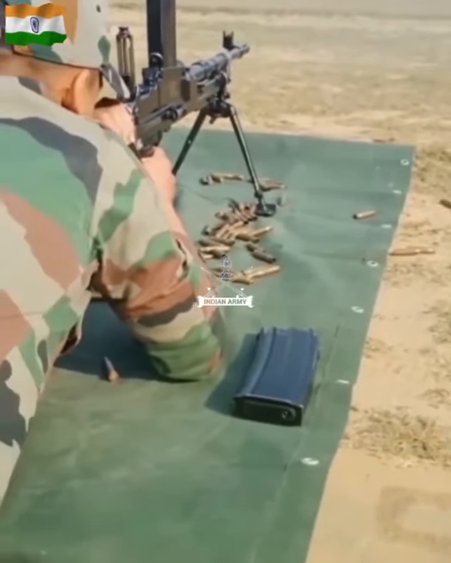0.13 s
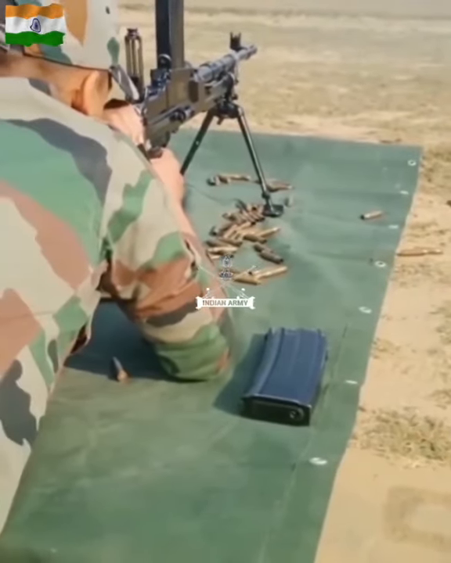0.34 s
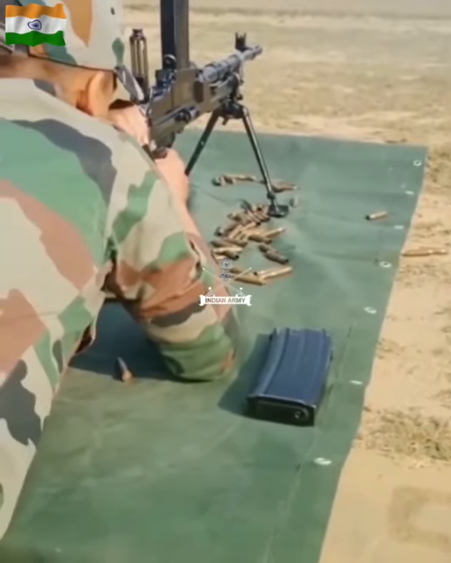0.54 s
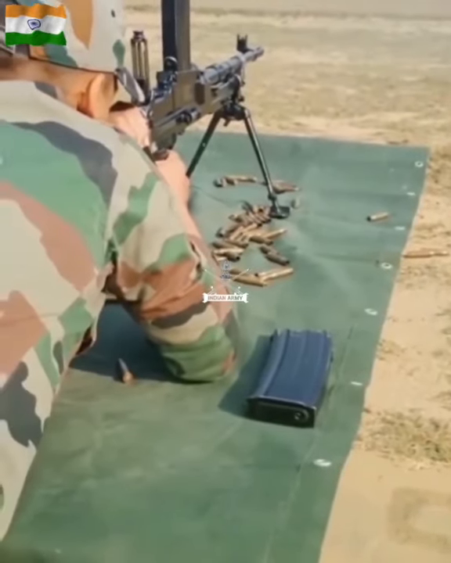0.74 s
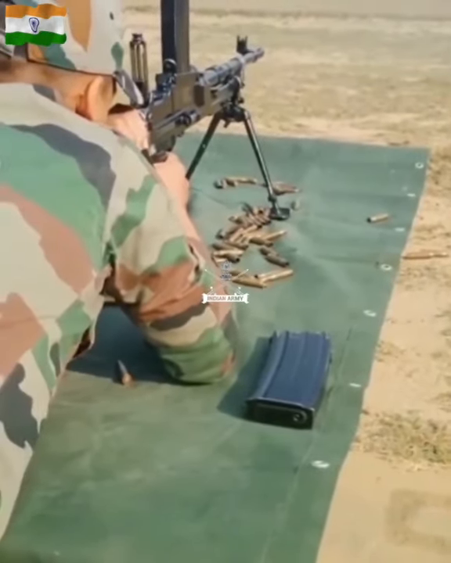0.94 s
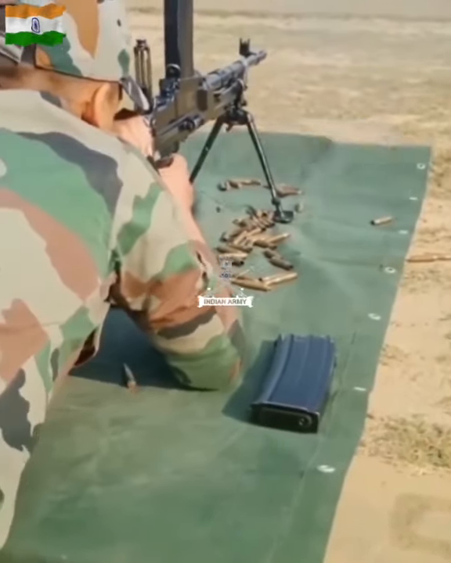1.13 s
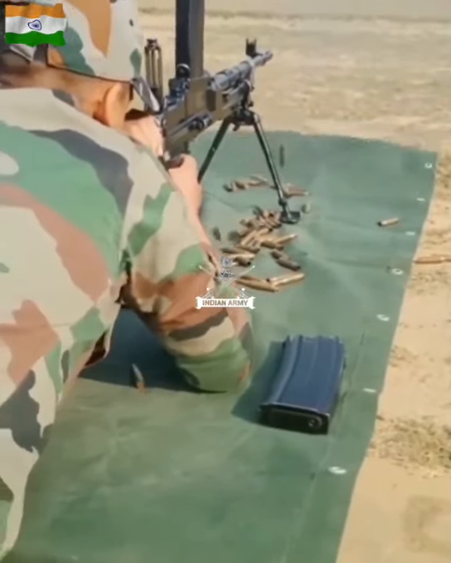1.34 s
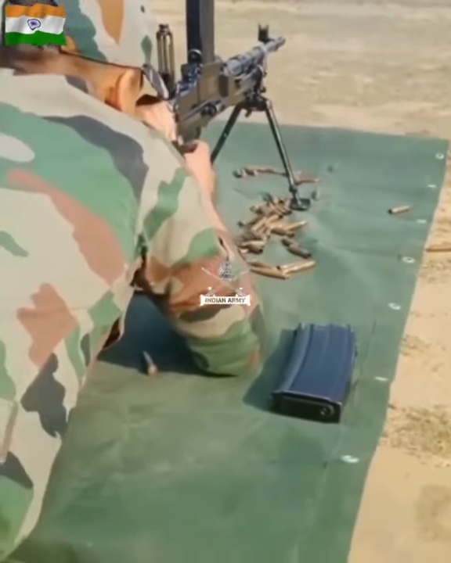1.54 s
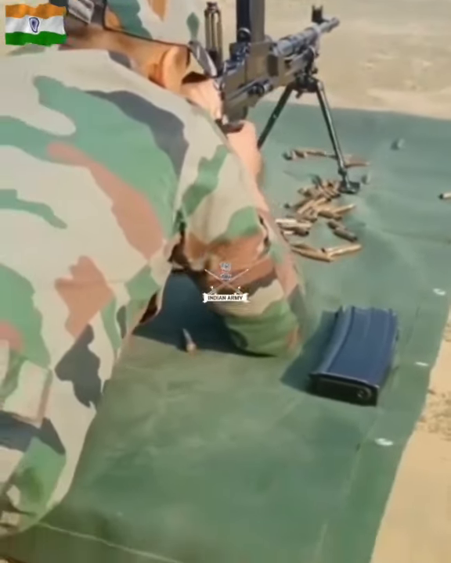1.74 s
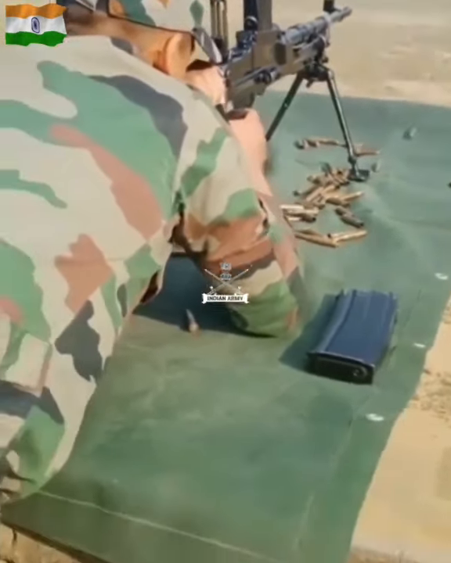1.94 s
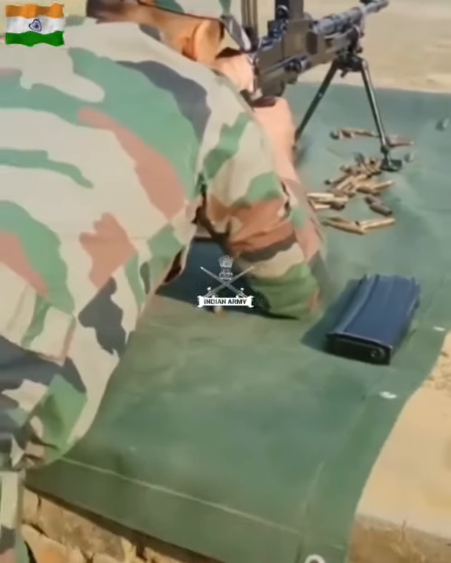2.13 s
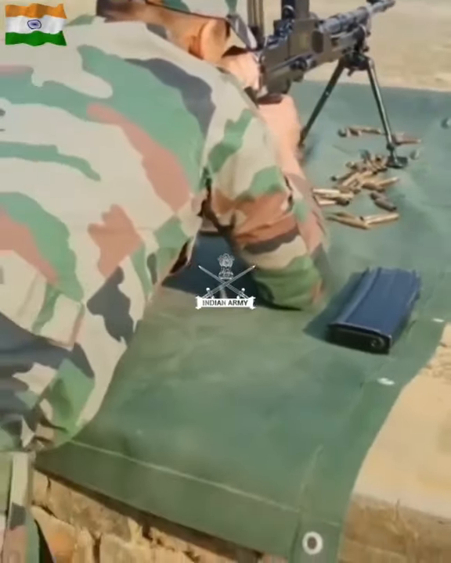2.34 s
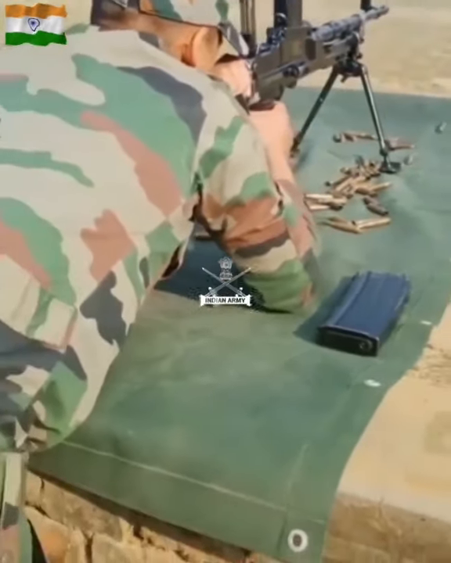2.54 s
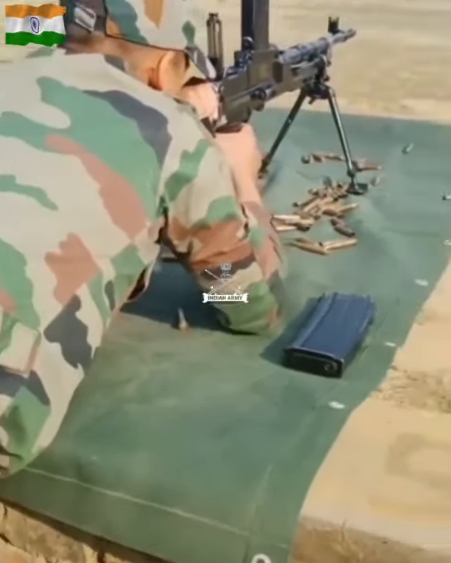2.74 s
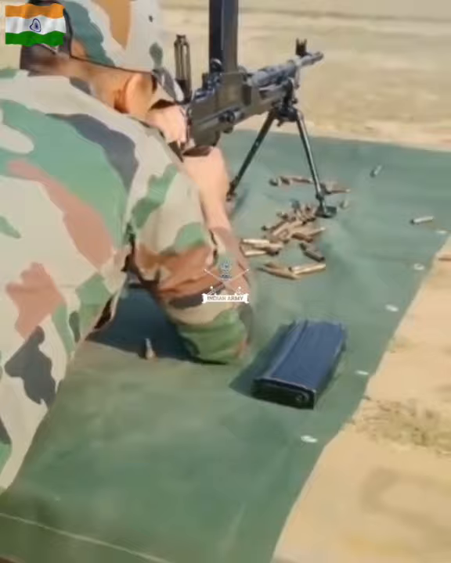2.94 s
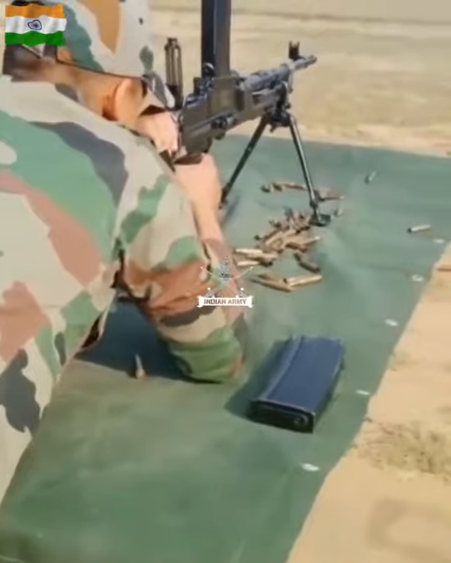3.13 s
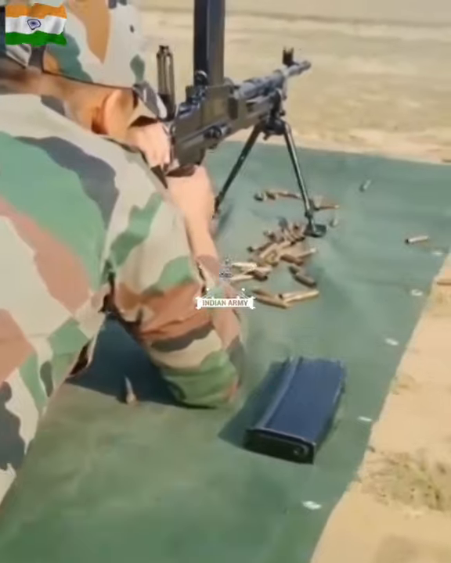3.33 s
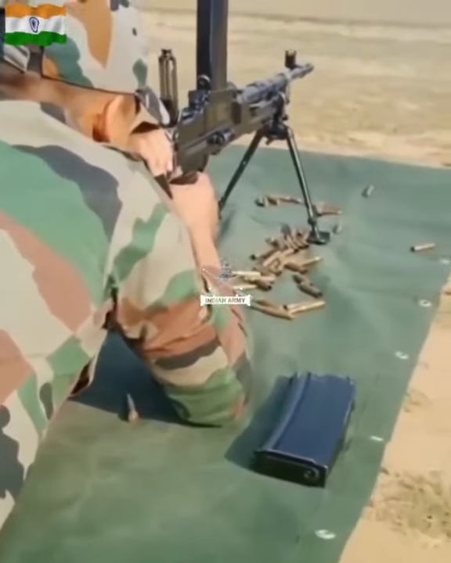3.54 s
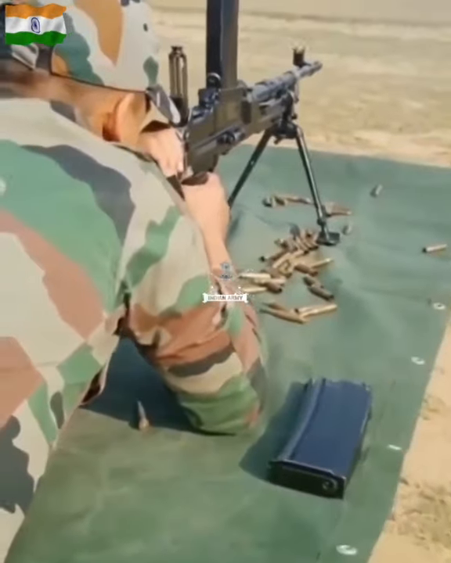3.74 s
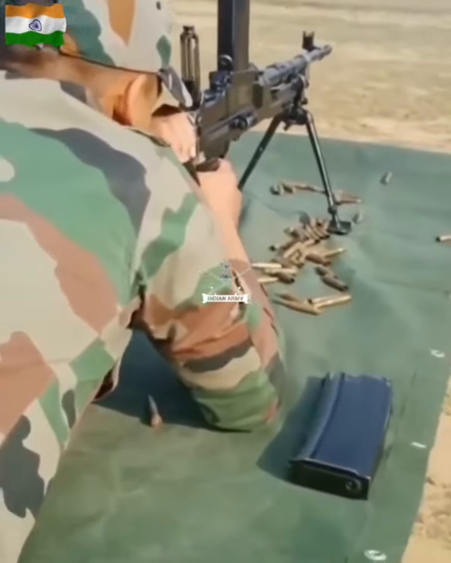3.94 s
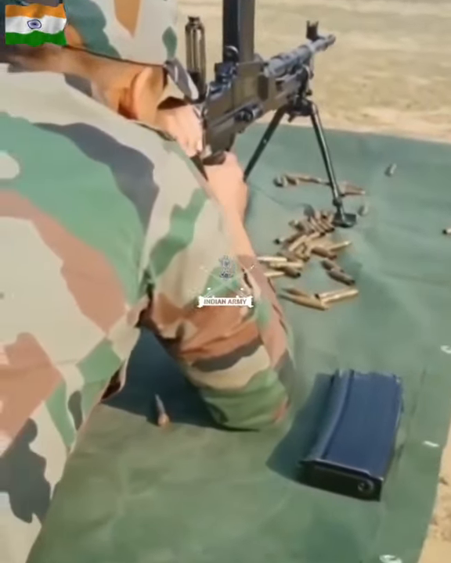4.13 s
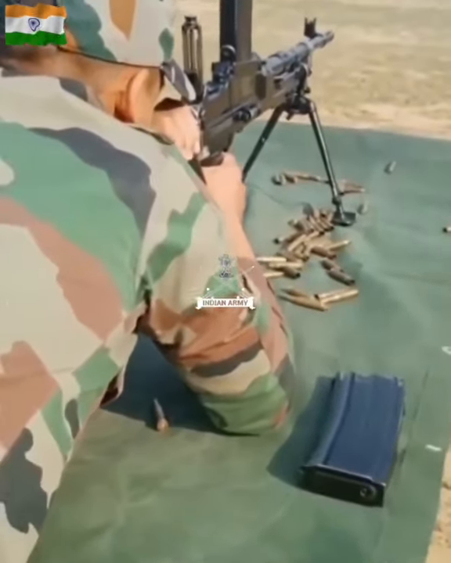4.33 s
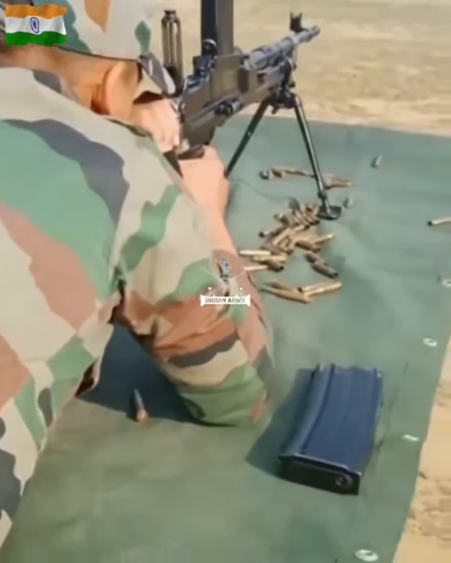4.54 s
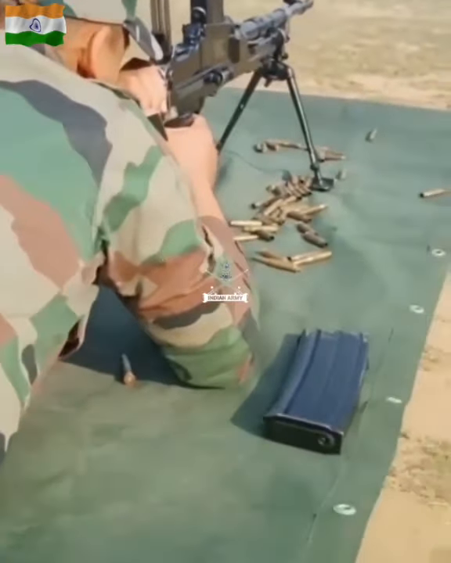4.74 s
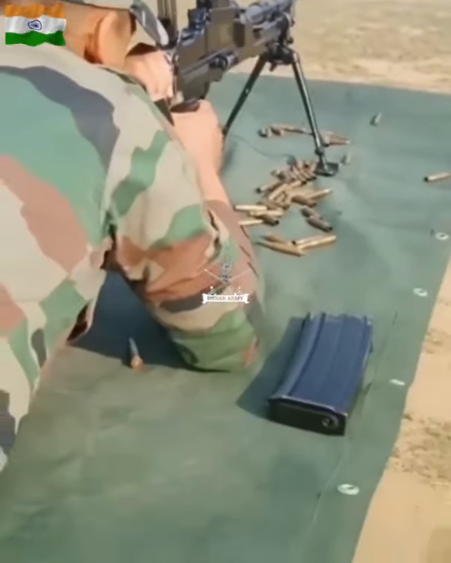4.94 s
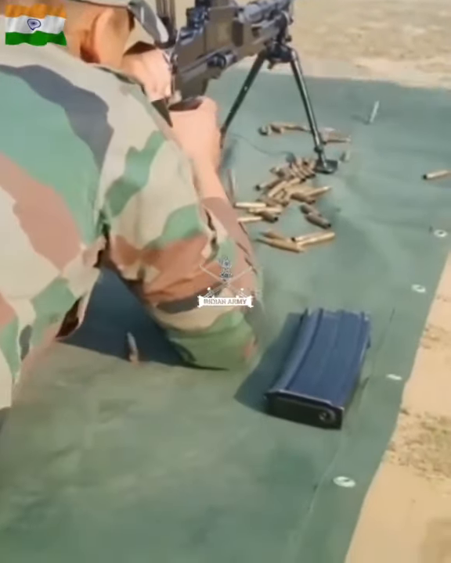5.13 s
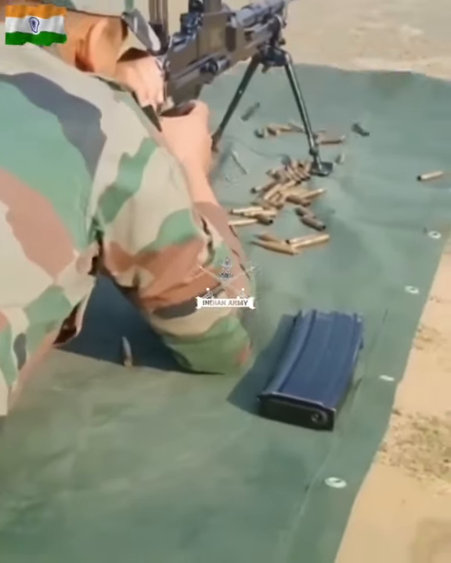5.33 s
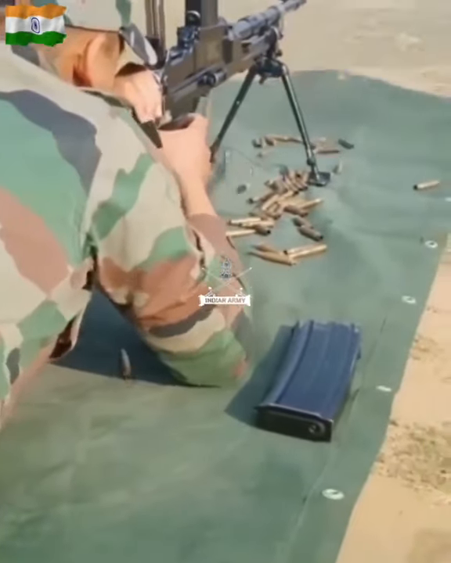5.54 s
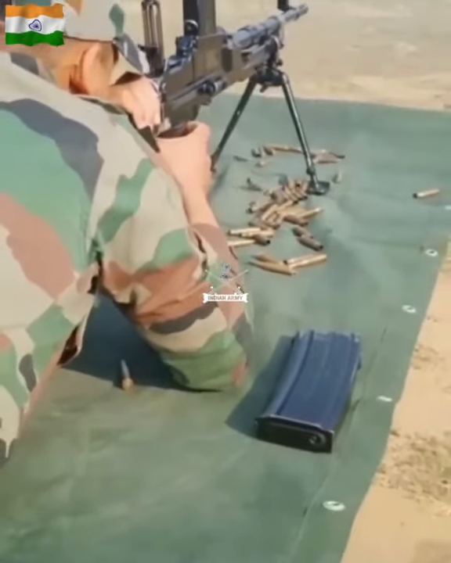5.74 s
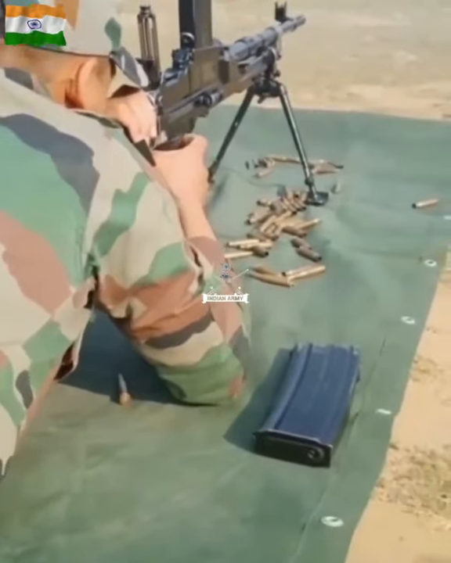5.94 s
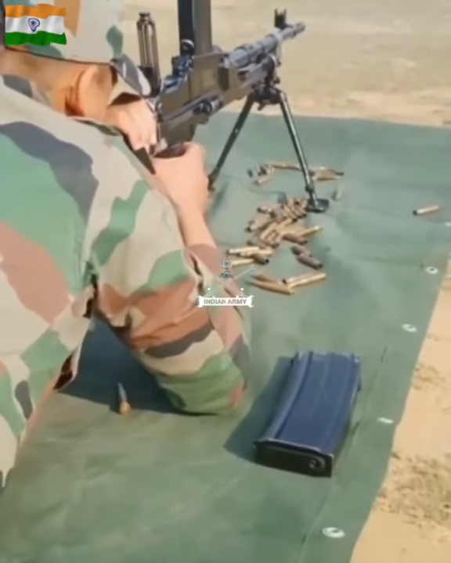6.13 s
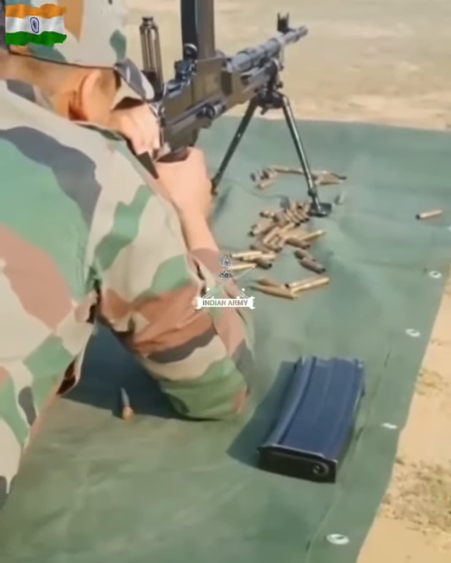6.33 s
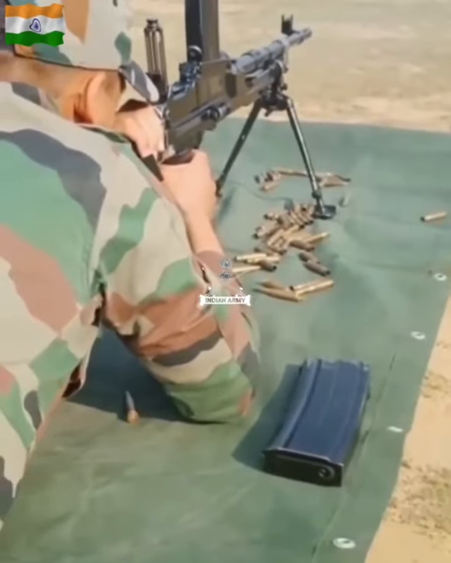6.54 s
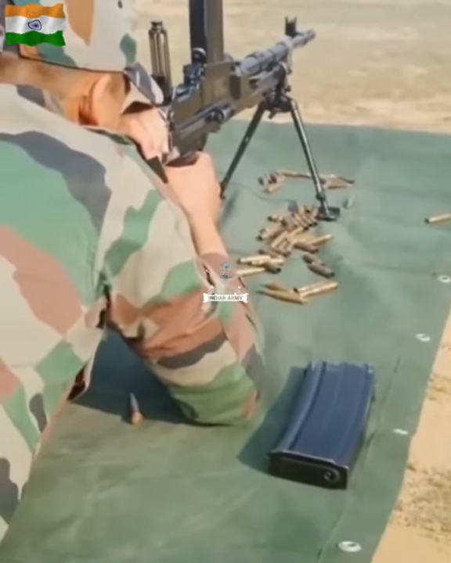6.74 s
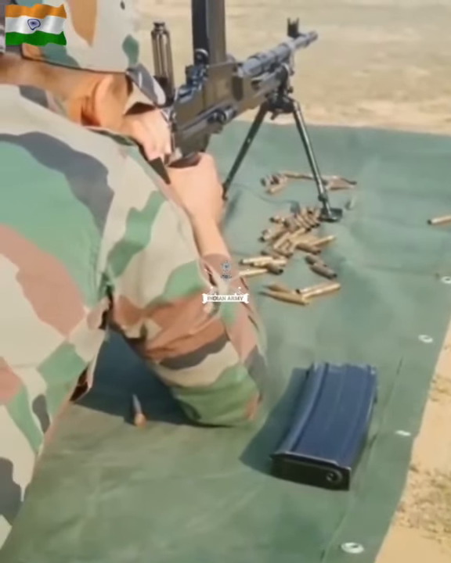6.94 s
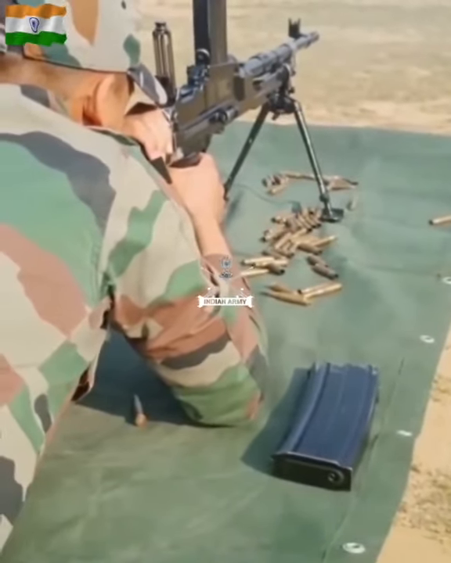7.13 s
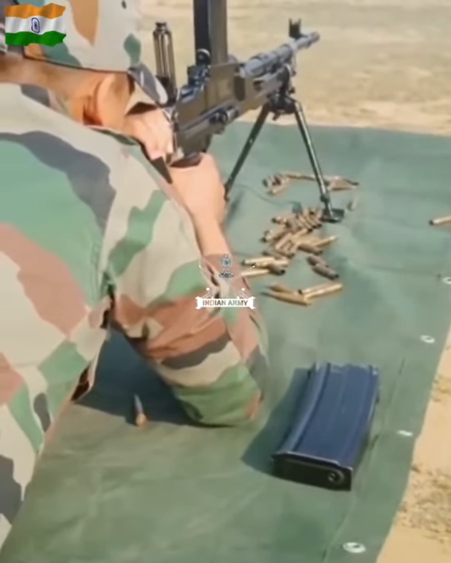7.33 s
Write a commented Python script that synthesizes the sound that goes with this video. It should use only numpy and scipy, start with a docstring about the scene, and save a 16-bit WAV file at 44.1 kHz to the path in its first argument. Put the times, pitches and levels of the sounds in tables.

```python
"""Small birds call over a low outdoor rumble; steel clacks, cloth rustles, and the bolt of a machine gun slides.
It fires three rounds: shaped noise makes each blast, a low tone its boom; walls slap back and the range rolls on.
Between the bursts the gunner works the action, heard as noise bursts ringing in steel, while the sleeve rustles.
After another slide of the bolt come four rounds, made the same way, and their rolling echo.
Near the end loose metal tinks, a bird whistles and steel clacks once more."""
import sys
import numpy as np
from scipy import signal
from scipy.fft import rfft, irfft
from scipy.io import wavfile

SR = 44100
rng = np.random.default_rng(int(sys.argv[2]) if len(sys.argv) > 2 else 0)


def unload_wav(signal):
    """Save mono or channel-first audio to the path in sys.argv[1] as 16-bit WAV at rate SR, clipped to [-1, 1]."""
    wavfile.write(
        sys.argv[1],
        SR,
        np.round(np.clip(np.atleast_2d(signal).T, -1, 1) * 32767).astype(np.int16),
    )


N = 325899
TIME = np.arange(N) / SR  # seconds

# Levels and spectra in the tables are relative: the functions below mix and filter them further.
# Rounds fired: start_s [s], blast_db [dB], boom_db [dB], slap_db (wall echoes) [dB], bolt_db [dB]
ROUNDS = [(1.166, -7.5, -12, -2, -24), (1.302, -10, -20, -2.5, -25), (1.441, -13, -16.5, -6, -31),
          (5.185, -8, -3.5, 5.5, -17), (5.326, -8.5, -4.5, 2, -16), (5.464, -9, -4, -0.5, -22),
          (5.608, -11, -10, -4.5, -27)]
# Colour of the muzzle blast: pitch_hz [Hz], level_db [dB per Hz]
BLAST_COLOUR = [(35, -40), (60, 1), (297, -1), (1120, -8), (1470, -6.5), (2100, -10), (2810, -10.5),
                (4720, -11), (6470, -16.5), (7240, -12), (8100, -11.5), (9920, -22.5), (13000, -21)]
# Muzzle gas, the same for every round [s]
SWELL_S, HOLD_S, COLLAPSE_S = 0.0024, 0.019, 0.021
# Walls and banks near the firing point: delay_s [s], level_db [dB]
REFLECTORS = [(0.0494, -2), (.061, -10), (0.07, -10), (.098, -13), (0.1037, -9.5), (.118, -7.5),
              (.1245, -10), (0.164, -13), (0.191, -19), (.243, -16.5)]
# A weaker reflector is duller: treble edge of a 0 dB reflection [Hz], loss that lowers it an octave [dB],
# level of the crack on top of a 0 dB reflection [dB]
WALL_EDGE_HZ, WALL_DB_PER_OCTAVE, CRACK_DB = 2030, 10, -10.5
# Rolling echo of the range: pitch_hz [Hz], early_db [dB], far_db [dB], far_t60_s (time to fall 60 dB) [s]
RANGE_BANDS = [(70, -54.5, -73, 2.5), (178, -28, -40.5, 1.4), (324, -24, -27, 1.61),
               (615, -19.5, -31, 1.94), (950, -39.5, -38, 2.7), (1670, -22.5, -36, 2.43),
               (2630, -35, -37.5, 1.82), (3900, -30.5, -33.5, 1.55), (6940, -45.5, -39.5, 1.32),
               (11300, -42.5, -48, 1.0)]
# Far bank: arrival and build-up of its echo, centre and half width of the louder answer of its face [s]; boost [dB]
FAR_S, FAR_RISE_S, BANK_S, BANK_WIDTH_S, BANK_DB = .27, .034, 0.327, 0.04, 3
# Resonances around the firing point: pitch_hz [Hz], width_hz [Hz], boost_db [dB]
HOLLOW_RESONANCES = [(178, 39, 8), (206, 11, 6), (262, 22, 3.5), (307, 41, 7.5), (448.7, 9, 4.5),
                     (638.6, 2.9, 6.5), (785, 10, 1), (878, 47, 1), (949, 16, 2.5), (1405, 35, 3),
                     (1560, 38, 2.5), (1655, 23, 6), (4100, 54, 5), (4330, 108.3, 2), (7200, 48, 1)]
# Steel parts of the action meeting: start_s [s], level_db [dB], decay_s [s], knock_db (against level_db) [dB]
STEEL_CLACKS = [(.519, -18.5, 0.0056, -5.5), (1.099, -22, .004, -12), (2.346, -24.5, 0.009, -23),
                (3.011, -48, 0.0062, -25), (3.192, -51, .008, -20), (3.484, -51, 0.0055, 15),
                (3.534, -26, 0.0069, -8), (3.667, -47, .012, -14), (3.787, -34, .0073, -10),
                (4.1295, -14.5, 0.0066, -15), (4.318, -14, 0.0037, -0.5), (4.57, -60, .004, -8),
                (4.666, -43, 0.004, 3), (5.120, -8, 0.0017, -16.5), (7.37, -30, 0.008, 2.5)]
# Every clack builds up alike and bounces once: times [s], bounce level against the first hit [dB]
CLACK_RISE_S, BOUNCE_S, BOUNCE_DB = 0.0026, .017, -20
# Colour of the steel chatter: pitch_hz [Hz], level_db [dB per Hz]
STEEL_COLOUR = [(180, -24.5), (300, -1.5), (671, -3), (1220, -6.5), (1670, -7), (2150, -8.5), (2950, -6.5),
                (3300, -7), (4810, -4.5), (5380, -5), (6500, -7), (7370, -5), (9790, -10.5), (13000, -13)]
# Ring of the receiver, the gun's metal body: pitch_hz [Hz], width_hz [Hz], level_db [dB]
RECEIVER_RING = [(734, 23, -15), (1530, 30, -5.5), (1677, 40, -7), (2560, 100, -8), (2980, 27, -4.5),
                 (3730, 70, -4), (4430, 29, -2), (4850, 57, -8.5), (5980, 90, -4.5), (6990, 67, -2.5),
                 (7300, 80, -11.5), (7590, 150, -2), (8150, 110, 0.5), (8900, 57, -7)]
# The bolt sliding on its rails: start_s [s], end_s [s], level_db [dB]
BOLT_SLIDES = [(0.52, 0.624, -47), (1.102, 1.155, -24.5), (2.364, 2.444, -56), (4.297, 4.335, -43),
               (5.121, 5.175, -18)]
# The bolt locks just before each round [s] and rattles after it: length [s], level against the lock [dB]
LOCK_LEAD_S, LOCK_RISE_S, LOCK_DECAY_S = 0.0086, .004, .008
RATTLE_S, RATTLE_DB = 0.16, -9
# Light tinks of loose metal: start_s [s], level_db [dB]
METAL_TINKS = [(1.052, -51), (1.069, -54), (3.039, -54), (3.195, -47.5), (3.232, -56), (6.624, -59),
               (6.652, -54.5), (6.988, -63)]
TINK_RISE_S, TINK_DECAY_S = 0.0017, .009
# Arm movements that drag the sleeve over the groundsheet: middle_s [s], half_length_s [s], level_db [dB]
ARM_MOVES = [(.7, 0.066, -69.5), (3.077, 0.21, -61.5), (3.64, 0.18, -56.5), (4.278, 0.33, -58.5),
             (4.73, 0.052, -57), (4.954, 0.052, -65)]
CLOTH_REST_DB = -76  # faint crinkle while the gunner lies still
# Colour of the cloth: pitch_hz [Hz], level_db [dB per Hz]
CLOTH_COLOUR = [(300, -9), (900, -0.5), (1800, 6), (2800, -1), (4300, 1.5), (5800, -3.5), (7800, 0.5),
                (9500, -9), (13000, -9)]
# Bird whistles: start_s [s], length_s [s], first_hz [Hz], last_hz [Hz], level_db [dB]
WHISTLES = [(0.414, .11, 4660, 3350, -60), (.46, 0.073, 5650, 5250, -68), (0.675, 0.11, 4680, 3270, -63),
            (.8, 0.21, 4600, 4500, -75), (3.21, .14, 4420, 4360, -60), (7.278, 0.088, 5300, 5150, -66)]
BIRD_SCATTER_S = 0.006  # decay time of the scatter on the long way over the ground
# Outdoor rumble in three groups, before, between and after the bursts: time_s [s], level_db [dB]
RUMBLE_LEVELS = [
    [(0.0, -57), (0.362, -56.5), (0.95, -61.5)],
    [(2.45, -46.5), (3.58, -45.5), (4.6, -49.5)],
    [(6.6, -46), (6.966, -44.5), (7.33, -44)],
]
# Colour of the rumble: pitch_hz [Hz], level_db [dB per Hz]
AIR_COLOUR = [(15, -50), (25, -24), (44, -11.5), (91, 1.5), (169, 1), (209, -2.5), (567, -10.5),
              (831, -19.5), (1330, -28.5), (2730, -38.5), (4000, -42), (5200, -67), (8800, -120)]
TOP_HZ = 13150  # nothing is kept far above this pitch


def gunfire(duck_db=-6, recover_s=0.099, knee_db=-22):
    """All the sound of the shots; the phone's gain control holds the rolling echo down while blasts and slaps are loud."""
    near = blasts() + slaps()
    pole = np.exp(-1 / (recover_s * SR))
    power = signal.lfilter([1 - pole], [1, -pole], near ** 2)
    loudness = np.sqrt(np.maximum(power, 0))
    gain_db = duck_db * np.tanh(loudness / undb(knee_db)) ** 2 + 3
    shots = near + roll() * undb(gain_db)
    resonances = sum((undb(db) - 1) * resonate(shots, hz, width) for hz, width, db in HOLLOW_RESONANCES)
    return undb(-2.0) * (shots + resonances) + booms()


def blasts(ragged_db=0.5):
    """Muzzle gas: a ragged roar that swells, holds and collapses."""
    t = TIME[:SR // 4]
    swell = 1 - np.exp(-t / SWELL_S)
    collapse = np.exp(-np.maximum(t - HOLD_S, 0) / COLLAPSE_S)
    envelope = np.zeros(N)
    for start, db, *_ in ROUNDS:
        add(envelope, start, undb(db) * swell * collapse)
    return envelope * noise(BLAST_COLOUR) * undb(ragged_db * walk(460))


def booms(hz=314, peak_s=0.037, thump_hz=90, thump_db=-19):
    """Each blast sets the firing point booming for a few cycles, over a deeper thump."""
    out = np.zeros(N)
    t = TIME[:SR // 10]
    envelope = np.exp(-((t - peak_s) / .0135) ** 2)
    variations = rng.standard_normal((len(ROUNDS), 2))
    for (start, _, db, *_), (detune, phase) in zip(ROUNDS, variations):
        ring = np.sin(2 * np.pi * hz * (1 + .01 * detune) * t + phase)
        thump = undb(thump_db) * np.sin(2 * np.pi * thump_hz * t + 2 * phase)
        add(out, start, undb(db) * (ring + thump) * envelope)
    return out * (1 + .35 * walk(500))


def slaps(low_hz=270, crest_hz=900, sag_s=0.0039, spray_db=-6):
    """A rough wall stretches the shock into a few cycles, the lows arriving last, with a spray and a crack on top."""
    out = np.zeros(N)
    t = TIME[:SR // 25] - .006  # time zero is the middle of the slap
    hz = low_hz + (crest_hz - low_hz) / (1 + np.exp(2 * t / sag_s))
    cycles = 2 * np.pi * np.cumsum(hz) / SR
    envelope = np.sqrt(2) / (np.exp(-t / .001) + np.exp(t / .0035))
    for delay, db in REFLECTORS:
        edge_hz = WALL_EDGE_HZ * 2 ** (db / WALL_DB_PER_OCTAVE)
        for start, _, _, slap_db, _ in ROUNDS:
            stretch, phase, late = rng.standard_normal(3)
            wave = np.sin(cycles * (1 + .12 * stretch) + 2 * phase)
            dull = band(rng.standard_normal(len(t)), edge_hz, "low", order=3)
            spray = unit(band(dull, low_hz, "high"))
            crack = unit(band(rng.standard_normal(len(t)), [1000, 8000], "band", order=1))
            packet = wave + undb(spray_db) * spray + undb(CRACK_DB + db) * crack
            add(out, start + delay + t[0] + .0004 * late, undb(db + slap_db) * packet * envelope)
    return out


def roll(early_t60_s=1.0, late_db=-19, late_stretch=2.52, air_hz=3500, grain_db=4, flutter_db=2):
    """Rough ground scatters each shot early; the far bank answers later, each pitch band fading at its own rate."""
    t = TIME[:3 * SR]
    centres = np.log([row[0] for row in RANGE_BANDS])
    edges = np.exp(np.r_[centres[0] - .5, (centres[1:] + centres[:-1]) / 2, centres[-1] + .2])
    response = 0
    for (_, early_db, far_db, t60), lo, hi in zip(RANGE_BANDS, edges, edges[1:]):
        early = undb(early_db - 60 * t / early_t60_s) * np.clip((t - .02) / 0.044, 0, 1)
        decay = t60 / np.log(1000)
        far = undb(far_db) * strike(t - FAR_S, FAR_RISE_S, decay)
        late = undb(far_db + late_db) * strike(t - FAR_S, FAR_RISE_S, decay * late_stretch)
        late = late / (1 + (lo / air_hz) ** 2)  # the longest paths lose their treble to the air
        scatter = unit(band(rng.standard_normal(len(t)), [lo, hi], "band", order=3))
        response = response + scatter * np.sqrt(early ** 2 + far ** 2 + late ** 2)
    # the face of the bank answers loudly
    swell_db = BANK_DB * np.exp(-((t - BANK_S) / BANK_WIDTH_S) ** 2)
    # separate reflectors stand out early and blur together later
    uneven_db = (grain_db * walk(250) + flutter_db * walk(45))[:len(t)] * np.exp(-t / 0.36)
    response = response * undb(swell_db + uneven_db)
    out = np.zeros(N)
    for start, *_ in ROUNDS:
        add(out, start, undb(-3.5) * response)
    return out


def action(tail_db=-22, tail_decay_s=.028, ring_db=5, dry_db=-3.0, chatter_db=4, knock_hz=520):
    """Steel parts chatter as they meet, knock the stock and ring the receiver; the bolt scrapes between its stops."""
    contact, knock = cycling(), np.zeros(N)
    t = TIME[:SR // 3] - .03  # time zero is the hit; it builds up before
    for start, db, decay, knock_db in STEEL_CLACKS:
        hit = strike(t, CLACK_RISE_S, decay)
        bounce = undb(BOUNCE_DB) * strike(t - BOUNCE_S, CLACK_RISE_S, decay)
        tail = undb(tail_db) * strike(t, CLACK_RISE_S, tail_decay_s)
        add(contact, start + t[0], undb(db) * (hit + bounce + tail))
        add(knock, start + t[0], undb(db + knock_db) * strike(t, CLACK_RISE_S, 3.1 * decay))
    for start, end, db in BOLT_SLIDES:
        add(contact, start, undb(db) * stroke(end - start))
    stock = unit(band(rng.standard_normal(N), [knock_hz / 1.7, knock_hz * 1.92], "band"))
    steel = contact * noise(STEEL_COLOUR) * undb(chatter_db * walk(1200) - 3)
    chatter = steel + 0.41 * knock * stock
    ring = sum(undb(db) * resonate(chatter, hz, width) for hz, width, db in RECEIVER_RING)
    return undb(dry_db) * chatter + undb(ring_db) * ring


def cycling():
    """Contact force of the bolt in automatic fire: it locks, the round fires, and it rattles on its rails."""
    contact = np.zeros(N)
    t = TIME[:SR // 8] - .03  # time zero is the lock
    for start, *_, bolt_db in ROUNDS:
        add(contact, start - LOCK_LEAD_S + t[0], undb(bolt_db) * strike(t, LOCK_RISE_S, LOCK_DECAY_S))
        add(contact, start, undb(bolt_db + RATTLE_DB) * stroke(RATTLE_S))
    return contact


def stroke(length_s):
    """Envelope of a slide: it gathers speed, runs evenly and slows down."""
    return signal.windows.tukey(max(int(length_s * SR), 2), .5)


def tinks(hz=6120, width_hz=380):
    """Loose metal touches lightly and rings around one high pitch."""
    envelope = np.zeros(N)
    t = TIME[:SR // 8] - .01  # time zero is the touch
    for start, db in METAL_TINKS:
        add(envelope, start + t[0], undb(db) * strike(t, TINK_RISE_S, TINK_DECAY_S))
    return envelope * unit(resonate(rng.standard_normal(N), hz, width_hz))


def sleeve(crinkle_db=1.5, fold_db=2.5):
    """Cloth crinkles fold by fold, swelling and fading with each movement of the arm."""
    power = undb(CLOTH_REST_DB) ** 2
    for middle, half, db in ARM_MOVES:
        swell = undb(db) * np.exp(-.5 * ((TIME - middle) / half) ** 2)
        power = power + swell ** 2
    return noise(CLOTH_COLOUR) * np.sqrt(power) * undb(crinkle_db * walk(120) + fold_db * walk(27))


def birds(flutter_db=3):
    """Thin far whistles that slide quickly and then settle, blurred by the distance."""
    out = np.zeros(N)
    for start, length, first_hz, last_hz, db in WHISTLES:
        progress = np.linspace(0, 1, max(int(length * SR), 2))
        glide_hz = last_hz + (first_hz - last_hz) * (1 - progress) ** 1.6
        hz = glide_hz * (1 + .022 * walk(900)[:len(progress)])
        envelope = signal.windows.tukey(len(progress), .5)
        add(out, start, undb(db) * envelope * np.sin(2 * np.pi * np.cumsum(hz) / SR))
    scatter = rng.standard_normal(SR // 10) * np.exp(-TIME[:SR // 10] / BIRD_SCATTER_S)
    return signal.fftconvolve(out * undb(flutter_db * walk(250)), scatter / np.linalg.norm(scatter))[:N]


def rumble(waver_db=1.27, gain_db=2):
    """Low open-air rumble that wavers."""
    level_db = curve(np.concatenate(RUMBLE_LEVELS)) + gain_db
    return noise(AIR_COLOUR) * undb(level_db + waver_db * walk(14))


def spread(x, side_db=-7.0, from_hz=4400):
    """Bass and middle sit in the centre; the treble shimmers between left and right."""
    side = band(x * walk(400), from_hz, "high", order=10)
    return x + undb(side_db) * side * np.array([[1], [-1]])


def undb(db):
    """Turn decibels into a plain multiplier."""
    return 10 ** (np.asarray(db) / 20)


def unit(x):
    """Scale to an average strength (rms) of 1."""
    return x / np.sqrt(np.mean(x ** 2))


def curve(rows):
    """Join (time, value) rows by straight lines."""
    return np.interp(TIME, *np.transpose(rows))


def band(x, hz, kind, order=2):
    """Keep part of the pitch range with a Butterworth filter."""
    sos = signal.butter(order, np.clip(hz, 10, SR / 2 - 100), kind, fs=SR, output="sos")
    return signal.sosfilt(sos, x)


def noise(spectrum):
    """Noise of rms 1 coloured by (pitch, level) points."""
    hz, db = np.transpose(spectrum)
    bins = np.maximum(np.arange(N // 2 + 1) * SR / N, 1)
    gain = undb(np.interp(np.log(bins), np.log(hz), db))
    return unit(irfft(rfft(rng.standard_normal(N)) * gain, N))


def walk(rate_hz):
    """Random wander with a spread near 1: straight lines between random points, rate_hz points a second."""
    knots = rng.standard_normal(N // 10)
    return np.interp(TIME * rate_hz, np.arange(len(knots)), knots)


def strike(t, rise, decay):
    """Envelope that builds up to time zero and dies away after it."""
    return np.exp(np.where(t < 0, t / abs(rise), -t / abs(decay)))


def resonate(x, hz, width):
    """One resonance with gain 1 at its centre."""
    return signal.lfilter(*signal.iirpeak(hz, hz / abs(width), fs=SR), x)


def add(out, start_s, x):
    """Mix x into out from start_s on."""
    i = int(start_s * SR)
    out[i:i + len(x)] += x[:N - i]


def scene():
    """Gun, echoes and range together."""
    return spread(gunfire() + action() + tinks() + sleeve() + birds() + rumble())


def record(dry):
    """The phone rounds off the loudest peaks and cuts the top."""
    rounded = dry / (1 + (dry / .84) ** 6) ** (1 / 6)
    return signal.sosfilt(signal.ellip(10, .2, 100, TOP_HZ, fs=SR, output="sos"), rounded)


dry = scene()
out = record(dry)
unload_wav(out)
```